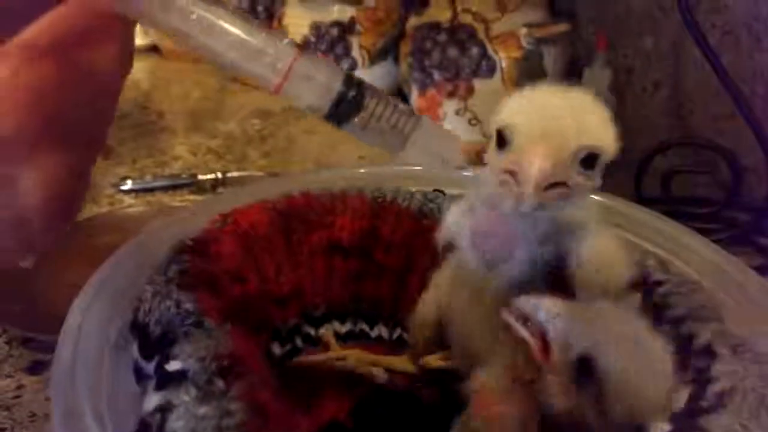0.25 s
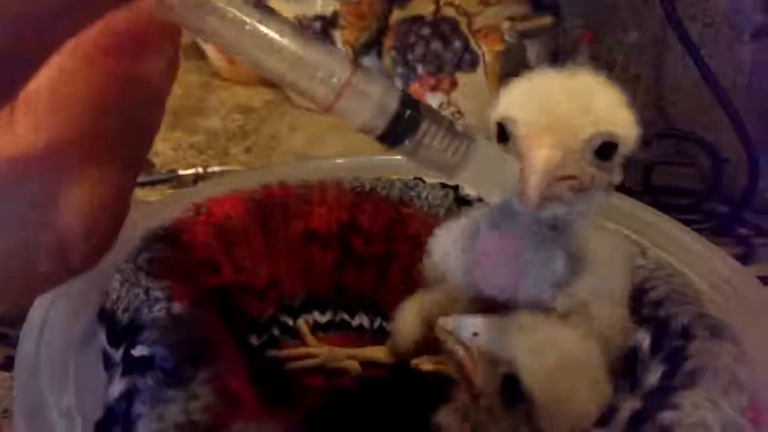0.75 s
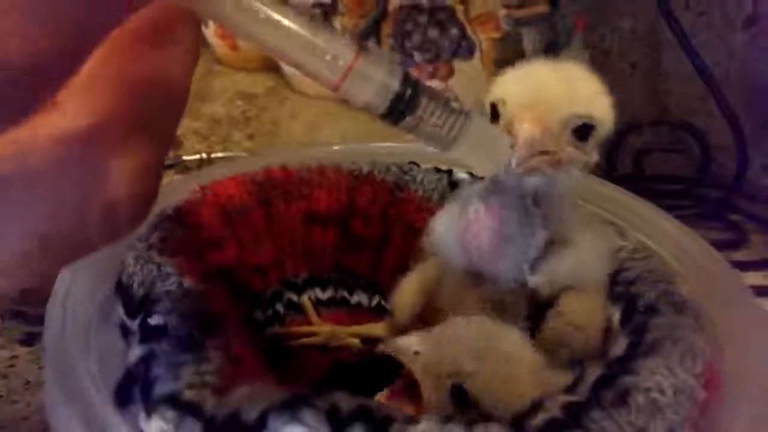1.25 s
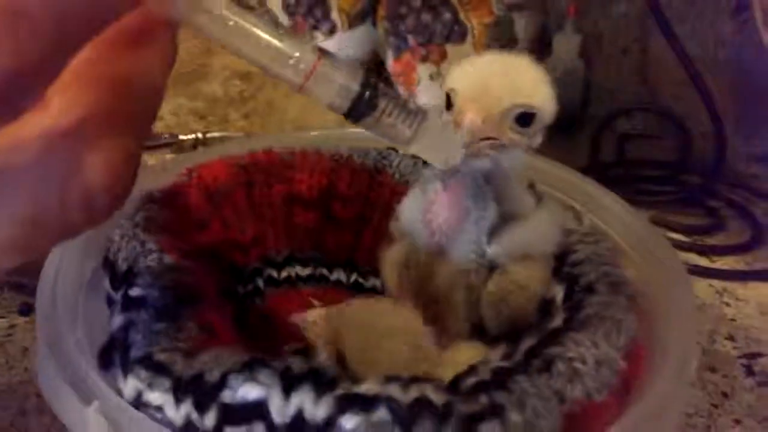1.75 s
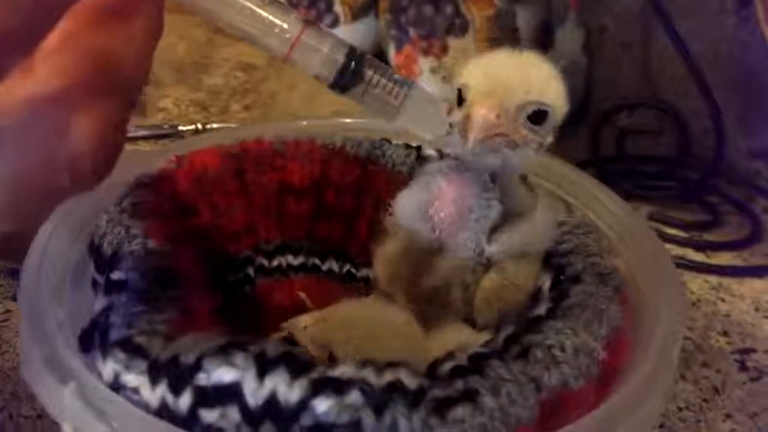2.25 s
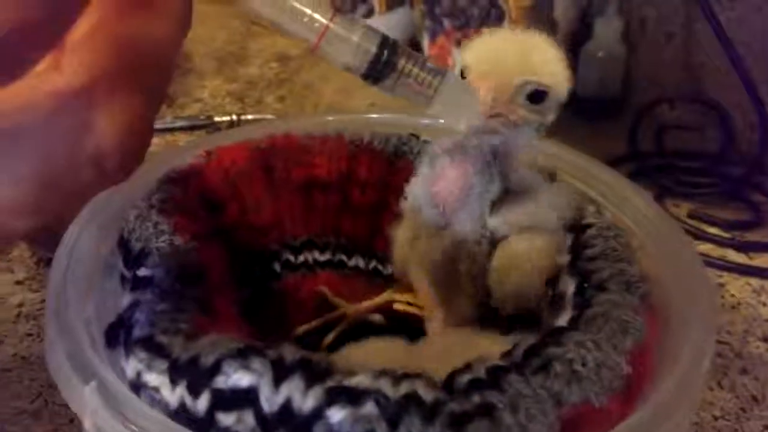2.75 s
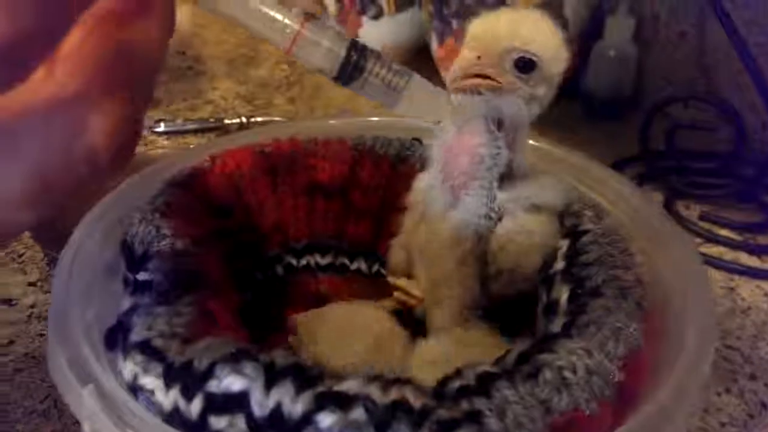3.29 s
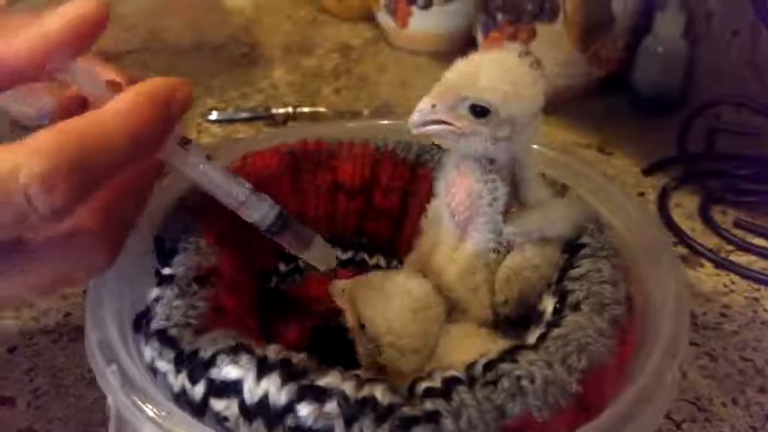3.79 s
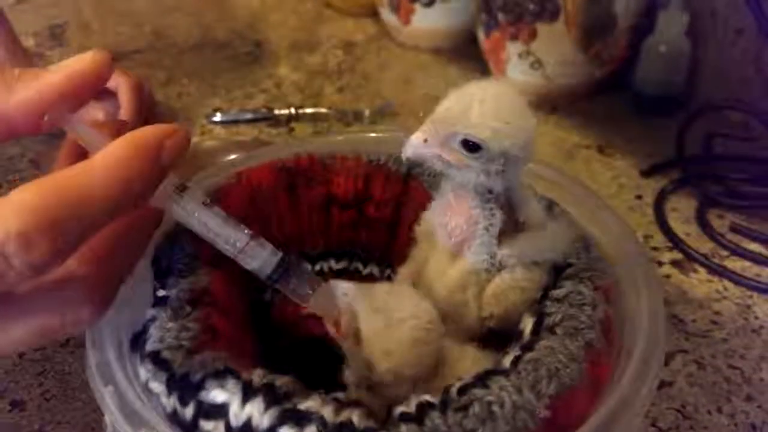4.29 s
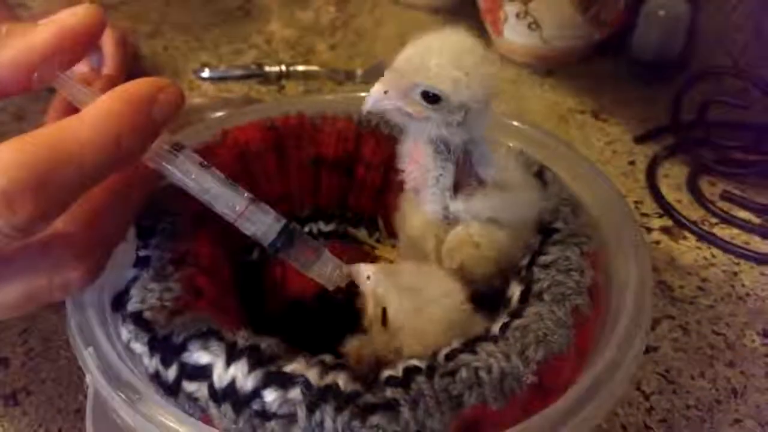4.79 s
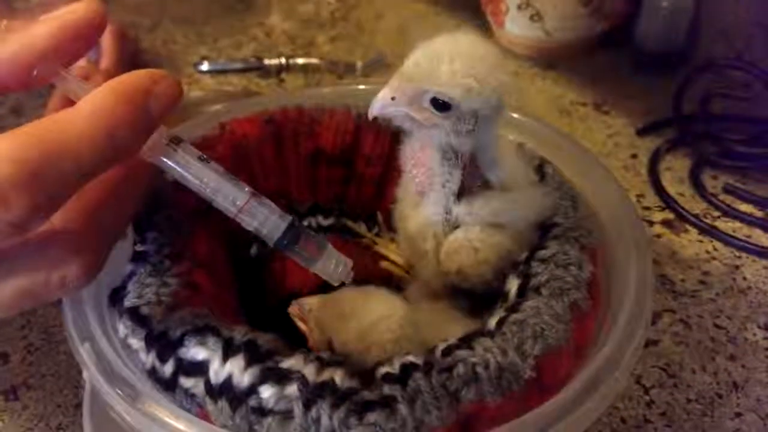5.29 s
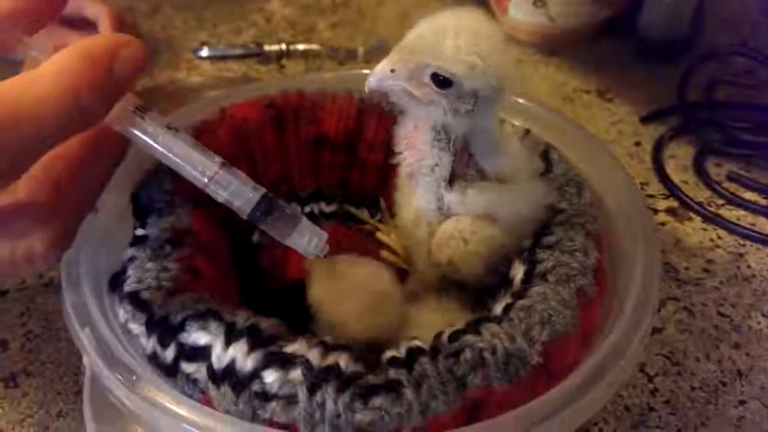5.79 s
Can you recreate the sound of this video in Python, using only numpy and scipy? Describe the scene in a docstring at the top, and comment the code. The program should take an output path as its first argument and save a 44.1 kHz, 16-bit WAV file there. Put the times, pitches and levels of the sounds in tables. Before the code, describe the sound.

A nestling bird of prey begs for food close to a small stereo microphone in a kitchen. Its short, high squeals come in quick bursts of two or three, mixing sliding whistles with a scratchy rasp. Its beak ticks faintly now and then. The cries have quick echoes and a very short room tail. They stop near the end, leaving soft room air and a low appliance hum.

```python
"""Kitchen: a nestling begs close to a small stereo microphone, in bursts of two or three squeals.
Both halves of its voice box whistle overlapping glides; at full effort the membranes break into a rasp.
Its beak ticks now and then. Bowl and counter throw quick echoes; the room adds a short tail.
An appliance motor hums over the room air throughout."""
import sys
import numpy as np
from scipy import signal
from scipy.fft import rfft, irfft
from scipy.io import wavfile
from scipy.ndimage import uniform_filter1d, map_coordinates

SR = 44100
rng = np.random.default_rng(int(sys.argv[2]) if len(sys.argv) > 2 else 0)


def unload_wav(signal):
    """Save mono or channel-first audio to the path in sys.argv[1] as 16-bit WAV at rate SR, clipped to [-1, 1]."""
    wavfile.write(
        sys.argv[1],
        SR,
        np.round(np.clip(np.atleast_2d(signal).T, -1, 1) * 32767).astype(np.int16),
    )


N = 266364

# room air spectrum: freq_hz, relative_db
AIR_SPECTRUM = [(25, -13.5), (53, -20), (72, -1.5), (125, -3.5), (165, -17.5), (270, -6), (360, -11),
                (585, -20), (1000, -21.5), (1540, -21.5), (5630, -29), (8000, -32.5), (15700, -34.5)]
# likeness of the air at the two ports: freq_hz, correlation
AIR_CORRELATION = [(60, 1), (240, 0.7), (950, -0.21), (3770, -0.07), (15000, -0.025)]
# air balance: freq_hz, left_over_right_db
AIR_BALANCE = [(60, -1.5), (150, 1.9), (350, 3), (3000, 3), (15000, -2)]
# motor orders, fundamental first: level_db
MOTOR_ORDERS = [-67, -74.5, -73.5, -68.5]
# whistles: start_s, length_s, first_hz, middle_hz, last_hz, middle_db, swell_db, second_harmonic_db
GLIDES = [ (.0, 0.025, 3340, 3130, 2900, -39, 10, -35), (0.025, 0.043, 2860, 2518, 2220, -34, -7, -26),
          (0.024, 0.022, 4500, 4720, 4740, -31, 10, -24), (0.037, 0.061, 4840, 4570, 4360, -31.5, -4, -17),
          (0.063, 0.063, 2943, 3260, 3490, -27.5, -6, -34), (0.068, 0.033, 5480, 5750, 6300, -39, -1, -7),
          (0.119, .082, 4190, 5840, 4300, -28, 2, -16), (0.184, 0.025, 3563, 3150, 2470, -21.5, 6, -15),
          (0.206, .022, 2560, 2580, 2280, -25, -13, -5), (0.48, 0.0094, 2400, 2486, 2750, -30, 22, -8.5),
          (0.485, 0.022, 3640, 4520, 4570, -33.5, -1, -15), (0.504, 0.091, 2857, 3100, 2780, -34, 11, -30),
          (0.548, .05, 4460, 3980, 3380, -26.5, -1, -29), (0.589, 0.022, 3460, 3720, 4260, -22, -16, -26),
          (0.654, 0.043, 6270, 6200, 6380, -35.5, 14, -40), (0.661, 0.037, 4720, 3900, 3500, -36, -2, -15),
          (0.682, 0.041, 4910, 4370, 3990, -28, 0, -27), (0.723, 0.023, 3970, 4060, 4430, -31, -2, -30),
          (0.692, 0.048, 2677, 2630, 3000, -37, -15, -4.5),
          (0.762, 0.059, 2950, 3220, 3387, -36.5, 10, -12.5), (0.747, 0.046, 5300, 5900, 6700, -41, 6, -16),
          (0.798, .023, 5490, 5170, 4750, -23.5, -9, -16),
          (0.806, 0.029, 3520, 3276, 2765, -25.5, -4, -14.5), (0.832, 0.033, 2865, 2233, 1830, -31, -19, 3),
          (1.054, .009, 1960, 2095, 2100, -34, -1, 1), (1.063, 0.044, 4260, 4780, 5800, -40, 24, -9),
          (1.097, 0.04, 5800, 5330, 4700, -29, -16, -18.5),
          (1.12, 0.06, 3105, 2700, 2890, -27.5, -7.5, -2.5),
          (1.188, 0.047, 5220, 6200, 6040, -27.5, 2, -11.5), (1.232, .032, 6230, 5810, 5230, -19.5, -5, -6),
          (1.248, 0.031, 3790, 3420, 3140, -28, 9.5, -3),
          (1.275, 0.037, 2797, 2650, 2890, -26.5, -12.5, 2.5),
          (1.316, .035, 5530, 5950, 6640, -27.5, -15.5, -25),
          (1.344, 0.038, 6350, 6050, 5300, -18.5, 8, -27), (1.374, .046, 3730, 2520, 2077, -30, -14.5, 2),
          (1.599, 0.051, 4200, 5370, 6200, -36.5, 7, -4), (1.645, .04, 6110, 5000, 4290, -30.5, -1, -40),
          (1.692, 0.048, 4380, 4240, 4450, -47, -22, -28), (1.706, 0.072, 4550, 5900, 6300, -36, 23, -10),
          (1.752, .035, 6320, 5400, 4290, -28, 7, -10), (1.776, 0.045, 3297, 2700, 1983, -32.5, -2, 5.5),
          (2.116, 0.034, 3600, 4750, 4880, -42, 5, -4), (2.146, 0.056, 4800, 4500, 4560, -40.5, -3, -7),
          (2.15, 0.12, 3460, 2720, 3430, -42, -5, -35), (2.183, 0.046, 4620, 3930, 3460, -33.5, -1, -26),
          (2.221, 0.018, 3490, 3660, 4120, -38, -6, -21), (2.305, 0.024, 3730, 3700, 3630, -33.5, 5, -31),
          (2.324, 0.042, 4420, 3940, 3470, -30.5, -4, -14), (2.365, 0.016, 3600, 3750, 4250, -37, -21, -14),
          (2.372, 0.054, 4120, 5850, 6250, -48.5, 11, -8), (2.445, 0.045, 4990, 4520, 4330, -30.5, 1, -15),
          (2.475, 0.015, 3270, 2980, 2420, -30, 3, -6), (2.483, 0.035, 2616, 2224, 1910, -31.5, -14, -0.5),
          (2.71, 0.035, 3510, 4300, 5100, -51, -14, -30),
          (2.728, 0.026, 5330, 6400, 6950, -49.5, -4.5, -27), (2.755, .042, 5710, 4590, 4270, -35, -7, -6),
          (2.767, 0.033, 3414, 3290, 3160, -36, -20, -52), (2.795, 0.064, 4370, 4560, 5450, -49, -15, -10),
          (2.871, 0.027, 6110, 5080, 4300, -29, -12, -6),
          (2.881, 0.041, 3362, 2430, 1940, -31.5, -10, -2.5), (2.892, 0.025, 4460, 4440, 3950, -37, 2, -2),
          (3.155, 0.024, 5200, 6400, 6580, -46.5, -13, 0), (3.189, 0.027, 5940, 5380, 4420, -24, 1, -4),
          (3.22, 0.022, 4615, 4630, 4630, -33.5, -15, -9), (3.232, 0.035, 2810, 2830, 2750, -47, -15, -27),
          (3.277, 0.023, 6600, 7170, 7620, -51, 14.5, -27), (3.297, 0.035, 6250, 5780, 5020, -31, 25, 5.5),
          (3.318, 0.0388, 3395, 3680, 3830, -29, -1, -16), (3.616, 0.048, 4130, 5780, 5810, -36.5, 18, 2),
          (3.678, 0.057, 2590, 2580, 2710, -38.5, -7, -0.5),
          (3.746, 0.023, 5930, 5760, 6300, -36.5, 1, -24.5), (3.767, 0.037, 4300, 3870, 2870, -46, 3, -14),
          (3.784, 0.055, 2816, 2130, 1990, -37.5, -19, 1.5), (4.03, 0.033, 3150, 4410, 4840, -38.5, 11, -1),
          (4.044, 0.042, 5000, 5040, 4060, -37.5, 8, -0.5),
          (4.089, 0.046, 2453, 2392, 2505, -28, 0.5, -0.5),
          (4.172, 0.026, 5370, 4915, 4440, -36.5, -1, -24), (4.182, 0.024, 3720, 3240, 2550, -39, 16, -9),
          (4.198, 0.036, 2510, 2164, 1770, -34.5, -18, 2), (4.284, 0.012, 4750, 4140, 3180, -43, 3, -16),
          (4.298, 0.029, 2720, 2070, 1910, -37.5, -14.5, 3), (4.578, 0.018, 2980, 3870, 4230, -35, 5, 4),
          (4.591, 0.045, 4200, 5050, 5190, -33.5, 4, -10), (4.624, 0.041, 5160, 4570, 3860, -32, 14, -2.5),
          (4.664, 0.017, 2920, 2500, 2350, -30.5, 4, -6.5),
          (4.711, 0.029, 3980, 5170, 6350, -40.5, 4, -32.5),
          (4.737, 0.045, 6280, 5960, 5600, -38.5, -7, -32.5),
          (4.757, 0.046, 5650, 4460, 3580, -34, -15, -33),
          (4.995, .15, 5390, 5470, 5360, -69.5, -11, -28.5), ]
# beak lift of the upper harmonics: freq_hz, gain_db
BEAK_LIFT = [(4000, 0), (6500, 2), (8500, -1), (11000, -9), (14000, -16)]
# rasps: start_s, build_s, hold_s, peak_db, start_re_peak_db, cut_re_peak_db, low_gain_db, high_gain_db
SQUEALS = [ (0.016, 0.055, 0.032, -34.5, -13.5, -16, 9, 3.5),
           (0.109, .077, 0.052, -34, -10, -23, 11.5, 3.5), (0.485, 0.075, 0.028, -31, -21, -9.5, 9.5, 0.5),
           (0.641, 0.048, .05, -31, -20, -14.5, 8.5, -0.5), (0.757, 0.051, 0.037, -28, -19, -1, -4, 2.5),
           (1.064, 0.055, 0.041, -25, -16.5, -4.5, 0, 0),
           (1.19, 0.048, 0.05, -23, -17.5, -10.5, -2.5, -0.5),
           (1.319, 0.048, .043, -19.5, -23, -6, -4, -3.5), (1.601, 0.062, 0.038, -21, -24, -17, 1, -4),
           (1.723, 0.042, 0.043, -24.5, -24.5, -7, 2, -1),
           (2.115, 0.066, 0.062, -27.5, -22, -24.5, 4.5, -7.5),
           (2.275, 0.024, 0.057, -37.5, -5.5, 0, 9.5, -10.5),
           (2.399, 0.067, 0.033, -27.5, -22.5, -9.5, 8, -5),
           (2.733, 0.038, 0.032, -23, -27.5, -20.5, 5, -2),
           (2.853, 0.033, 0.057, -23, -22, -31.5, 5.5, 0.5),
           (3.155, 0.05, 0.055, -22.5, -34, -32.5, 5, -1.5), (3.272, 0.039, .045, -31.5, -20, -2.5, 0, -3),
           (3.613, .068, 0.063, -21, -26.5, -26.5, 1.5, -4),
           (3.751, 0.046, 0.04, -20.5, -26, -27, -3, -6.5), (4.033, 0.061, 0.048, -21, -24, -17, 3, -1),
           (4.16, 0.054, 0.022, -29.5, -7, -21, 3, 0.5), (4.239, 0.076, 0.0096, -36.5, -19, -25, 3.5, -3),
           (4.584, .061, 0.043, -23, -16, -28, 1.5, -4.5), (4.714, 0.076, 0.036, -30.5, -17.5, -28, 5, -9),
           ]
# throat colour of the rasp: freq_hz, relative_db
THROAT = [(900, -42.5), (1300, -24.5), (1740, -15.5), (2150, -18.5), (2500, -7), (3350, -2.5), (4300, -7.5),
          (5300, -3), (6500, 0.5), (8000, -4), (9500, -9.5), (11500, -4), (13000, -9), (15700, -17.5)]
# beak ticks: start_s, level_db
BEAK_TICKS = [(0.241, -42), (3.0583, -50.5), (3.546, -46), (4.495, -54.5), (4.535, -48.5), (4.845, -60.5),
              (5.0494, -60.5), (5.2355, -51)]
# kitchen decay: freq_hz, t60_s
KITCHEN_DECAY = [(1500, 0.18), (4000, .25), (10000, 0.2)]
# shading of the right port: freq_hz, gain_db
RIGHT_SHADE = [(1300, -5), (2400, -6.8), (4400, -4), (6500, -5.5), (8100, -11), (15000, -15)]
# head turns, on top of the shading: time_s, left_over_right_db
HEAD_TURNS = [(.1, -1), (.7, -2), (1.25, 1), (1.7, 2), (2.3, 1.5), (2.8, .5), (3.3, -1), (3.7, .2),
              (4.2, .7), (4.7, -1)]


def gain_of(db):
    return 10 ** (np.asarray(db) / 20)


def unit_rms(x):
    return x / np.sqrt(np.mean(abs(x) ** 2) + 1e-20)


def curve_at(points, hz):
    """Table lookup over log frequency."""
    freq_hz, value = np.transpose(points)
    return np.interp(np.log(hz + 1), np.log(freq_hz + 1), value)


def add(mix, start_s, sound):
    part = mix[round(start_s * SR):][:len(sound)]
    part += sound[:len(part)]


def colour(x, points):
    """Filter by a (freq_hz, gain_db) curve."""
    hz = np.fft.rfftfreq(len(x), 1 / SR)
    return irfft(rfft(x) * gain_of(curve_at(points, hz)), len(x))


def wander(count, cutoff_hz):
    """Low-passed random motion, rms 1."""
    noise = rng.standard_normal(count + 800)
    return unit_rms(signal.lfilter(*signal.butter(2, cutoff_hz, fs=SR), noise)[800:])


def room_air(level_db=-57.5):
    """Room air and microphone hiss: random short-time spectra, bass shared by both ports."""
    frames, hz = N // 512 + 5, np.fft.rfftfreq(2048, 1 / SR)
    left_re, left_im, own_re, own_im, patches = rng.standard_normal((frames, 1025, 5)).T
    patch_db = unit_rms(uniform_filter1d(uniform_filter1d(patches, 20, 0), 8, 1))
    shared = np.clip(curve_at(AIR_CORRELATION, hz), -1, 1)[:, None]
    left = left_re + 1j * left_im
    right = shared * left + np.sqrt(1 - shared ** 2) * (own_re + 1j * own_im)
    side_db = np.array([.5, -.5])[:, None, None] * curve_at(AIR_BALANCE, hz)[:, None]
    spectra = np.array([left, right]) * gain_of(curve_at(AIR_SPECTRUM, hz)[:, None] + side_db + patch_db)
    return gain_of(level_db) * unit_rms(signal.istft(spectra, nperseg=2048, noverlap=1536)[1][:, :N])


def motor_hum(motor_hz=90.4):
    """Wavering orders of an appliance motor; the upper ones lean left."""
    cycles = np.cumsum(motor_hz * (1 + .004 * wander(N, .96))) / SR
    out = np.zeros((2, N))
    for k, level_db in enumerate(MOTOR_ORDERS):
        sway_db = 3 * wander(N, 8)
        tone = np.sqrt(2) * np.sin(2 * np.pi * ((k + 1) * cycles + rng.random()))
        out += tone * gain_of(level_db + sway_db) * gain_of([[.39 * k], [-.7 * k]])
    return out


def whistle(glide, rasp_gain, jitter=.008, ragged=.016, shimmer=.2, ends_db=-4, thin_db_per_oct=12):
    """A membrane whistles up to five harmonics; more rasp makes pitch and swing more ragged."""
    start_s, length_s, first_hz, middle_hz, last_hz, middle_db, swell_db, second_harmonic_db = glide
    count = round(length_s * SR)
    pos = np.linspace(-.5, .5, count)
    pitch_hz = middle_hz + (last_hz - first_hz) * pos + 2 * (first_hz + last_hz - 2 * middle_hz) * pos**2
    gain = gain_of(middle_db + swell_db * pos + ends_db * (2 * pos) ** 2)
    chaos = np.minimum(rasp_gain[round(start_s * SR):][:count] / gain, 1.5)
    cycles = np.cumsum(pitch_hz * (1 + (jitter + ragged * chaos) * wander(count, 420))) / SR
    # a slack, low membrane slaps shut and is rich; stretched high it thins towards a sine
    rich_db = second_harmonic_db - thin_db_per_oct * np.log2(pitch_hz / pitch_hz.min())
    tone = np.sin(2 * np.pi * cycles)
    for k in range(2, 6):
        harmonic_db = rich_db + (k - 2) * (.49 * rich_db - 3.5) + curve_at(BEAK_LIFT, k * pitch_hz)
        tone += gain_of(harmonic_db) * (k * pitch_hz < 16000) * np.sin(2 * np.pi * k * cycles + k)
    swing = 1 + shimmer * (1 + chaos) * wander(count, 279)
    fade = signal.windows.tukey(count, min(1, 250 / count))
    return start_s, np.sqrt(2) * gain * swing * fade * tone


def effort(start_s, build_s, hold_s, peak_db, start_re_peak_db, cut_re_peak_db):
    """Rasp envelope of one squeal: quick attack, build-up, sagging hold, quick release."""
    attack_db_per_s, release_db_per_s, edge_s = 2399.5, 1151, .03
    first_s = max(start_s - edge_s, 0)
    peak_s = start_s + build_s
    t = np.arange(first_s, peak_s + hold_s + edge_s, 1 / SR) - peak_s
    attack_db = -attack_db_per_s * np.maximum(-t - build_s, 0)
    build_db = start_re_peak_db * np.clip(-t / build_s, 0, 1) ** .87
    sag_db = cut_re_peak_db * np.clip(t / hold_s, 0, 1) ** 1.07
    release_db = -release_db_per_s * np.maximum(t - hold_s, 0)
    return first_s, peak_db + attack_db + build_db + sag_db + release_db


def patchy_resonances(x, depth_db):
    """Short-lived, uneven resonances: random gain patches over time and frequency."""
    spectra = signal.stft(x, nperseg=256, noverlap=192)[2]
    patches = uniform_filter1d(uniform_filter1d(rng.standard_normal(spectra.shape), 4, 0), 16, 1)
    spectra *= gain_of(depth_db * unit_rms(patches))
    return signal.istft(spectra, nperseg=256, noverlap=192)[1][:len(x)]


def rasp(level_db, low_gain_db, high_gain_db, flutter_db=1.6, tilt_db_per_db=.05):
    """Chaotic membrane flapping: fluttering noise through the throat, duller when faint."""
    count = len(level_db)
    flaps = rng.standard_normal(count) * gain_of(flutter_db * wander(count, 900))
    voice = unit_rms(colour(patchy_resonances(flaps, depth_db=3.8), THROAT))
    low = colour(voice, [(3600, 0), (4400, -60)])
    high = colour(voice, [(8500, -60), (9500, 0)])
    tilt_db = tilt_db_per_db * np.minimum(level_db.max() - level_db, 30)
    voice += (gain_of(low_gain_db + tilt_db) - 1) * low
    voice += (gain_of(high_gain_db - tilt_db) - 1) * high
    return gain_of(level_db) * voice * signal.windows.tukey(count, .05)


def beak_tick(level_db, decay_s=.0012):
    """Small beak tick: a bright, fast-dying noise burst."""
    t = np.arange(100) / SR
    return gain_of(level_db) * np.diff(rng.standard_normal(101)) * np.exp(-t / decay_s)


def nestling():
    """Whistles, rasp and beak ticks, direct at the left port."""
    out, rasp_gain = np.zeros(N), np.zeros(N)
    for *envelope, low_gain_db, high_gain_db in SQUEALS:
        start_s, level_db = effort(*envelope)
        add(rasp_gain, start_s, gain_of(level_db))
        add(out, start_s, rasp(level_db, low_gain_db, high_gain_db))
    for glide in GLIDES:
        add(out, *whistle(glide, rasp_gain))
    for start_s, level_db in BEAK_TICKS:
        add(out, start_s, beak_tick(level_db))
    return out


def counter_echoes(bird, delay_s=.0004, decay_s=.004, burst_gap_s=.08):
    """Quick echoes off bowl and counter, per port; they change as the bird shifts between bursts."""
    t, out = np.arange(600) / SR, np.zeros((2, N))
    starts_s, builds_s, holds_s = np.transpose(SQUEALS)[:3]
    pauses_s = starts_s[1:] - (starts_s + builds_s + holds_s)[:-1]
    shifts_s = np.r_[0, starts_s[1:][pauses_s > burst_gap_s] - burst_gap_s / 2, N / SR]
    for start_s, end_s in zip(shifts_s, shifts_s[1:]):
        burst = bird[round(start_s * SR):round(end_s * SR)]
        responses = rng.standard_normal((2, len(t))) * (t > delay_s) * np.exp(-t / decay_s)
        for port, response in zip(out, responses):
            add(port, start_s, signal.oaconvolve(burst, response / np.linalg.norm(response)))
    return out


def kitchen_reverb(bird):
    """Room tail: sparse reflections of random sign per port, each band dying at its own rate."""
    taps = np.zeros((2, SR // 2))
    slots = np.arange(100, SR // 2 - 20, 20)
    arrivals = slots + rng.integers(0, 20, (2, len(slots)))
    np.put_along_axis(taps, arrivals, rng.choice([-1., 1.], arrivals.shape), 1)
    hz, t, spectra = signal.stft(taps, SR, nperseg=256)
    decay = gain_of(-60 * t / curve_at(KITCHEN_DECAY, hz)[:, None])
    tail = signal.istft(spectra * decay, SR, nperseg=256)[1]
    return signal.fftconvolve(bird[None], tail / np.linalg.norm(tail[0]), axes=1)[:, :N]


def scene():
    """Bird and echoes at both ports, the right one later and shaded, over air and hum."""
    bird, n = nestling(), np.arange(N)
    turn_db = np.interp(n / SR, *np.transpose(HEAD_TURNS))
    # the path to the far port lengthens as the head swings left, and bobs with it
    lag_samples = 7.8 + .35 * turn_db + .95 * wander(N, 8)
    ports = np.array([bird, map_coordinates(bird, [n - lag_samples], order=5)])
    ports += gain_of([[-15], [-8]]) * counter_echoes(bird)
    ports += gain_of([[-17], [-12]]) * kitchen_reverb(bird)
    ports[1] = colour(ports[1], RIGHT_SHADE) / gain_of(turn_db)
    return ports + room_air() + motor_hum()


def record(dry):
    """Band limit: steep low-pass."""
    cutoff_hz = 15770
    lowpass = signal.firwin(511, cutoff_hz, window=("kaiser", 9), fs=SR)
    return signal.oaconvolve(dry, lowpass[None], "same")


dry = scene()
out = record(dry)
unload_wav(out)
```